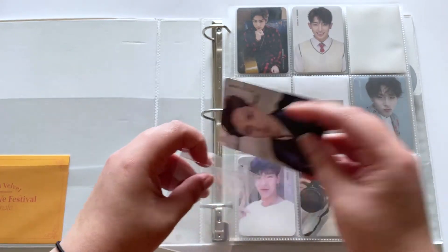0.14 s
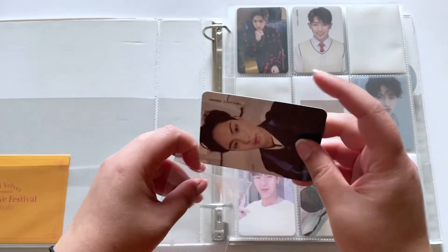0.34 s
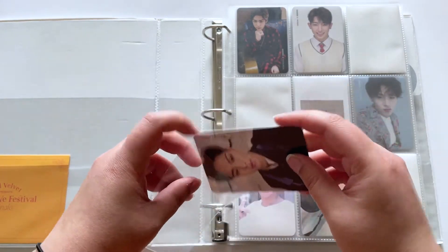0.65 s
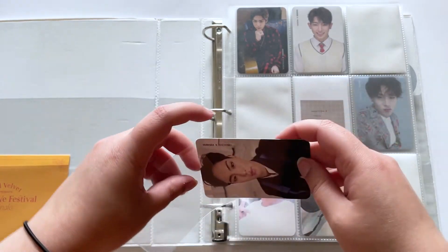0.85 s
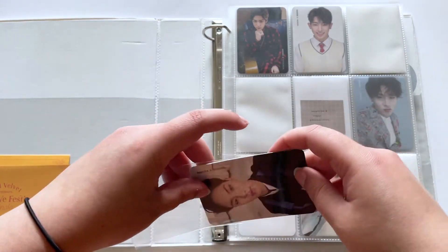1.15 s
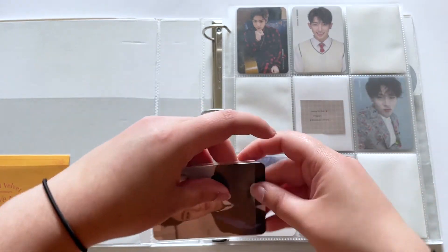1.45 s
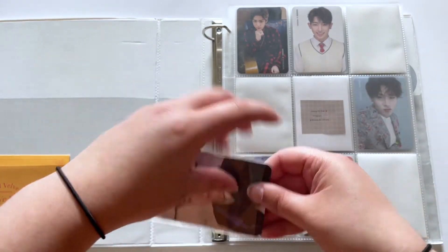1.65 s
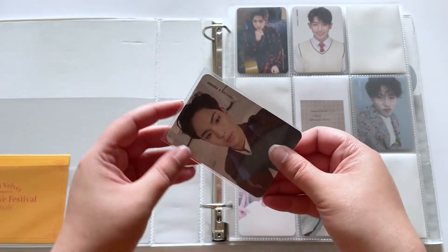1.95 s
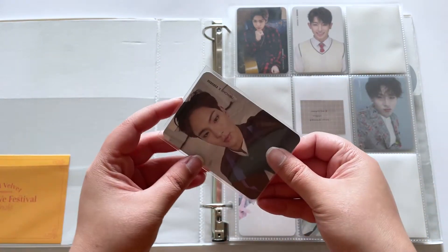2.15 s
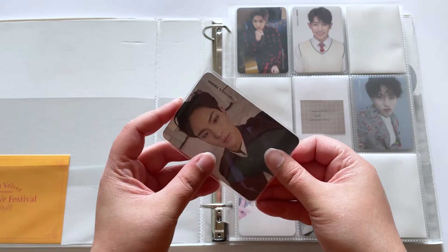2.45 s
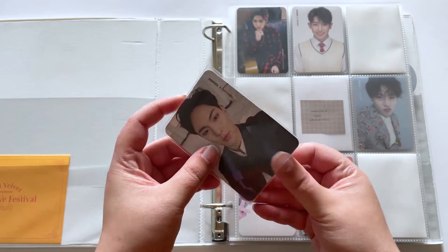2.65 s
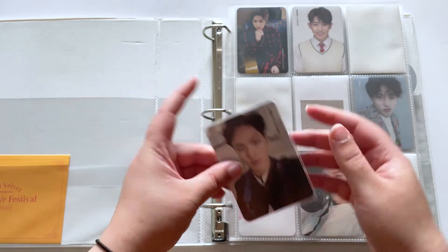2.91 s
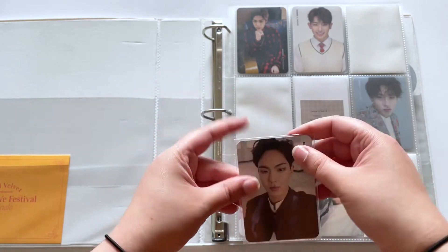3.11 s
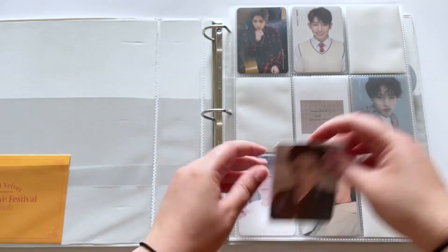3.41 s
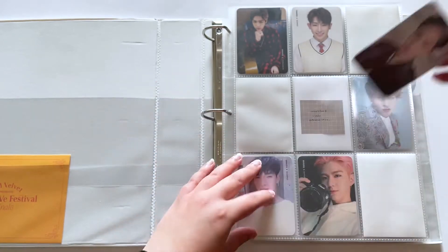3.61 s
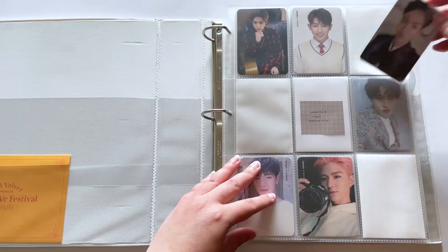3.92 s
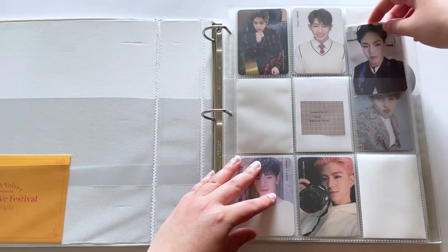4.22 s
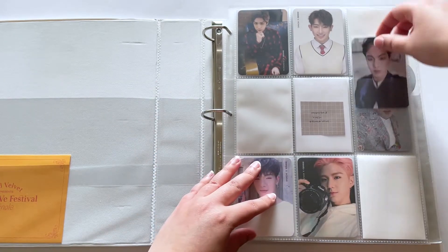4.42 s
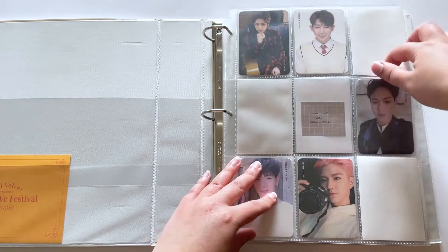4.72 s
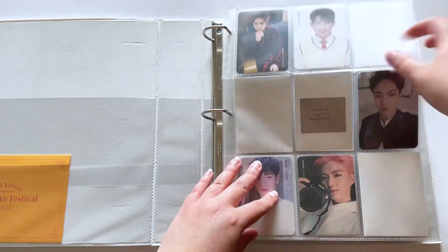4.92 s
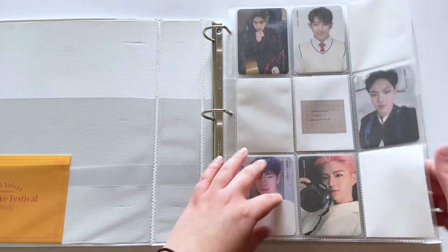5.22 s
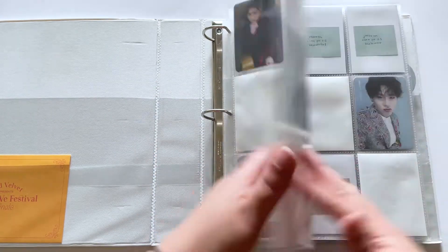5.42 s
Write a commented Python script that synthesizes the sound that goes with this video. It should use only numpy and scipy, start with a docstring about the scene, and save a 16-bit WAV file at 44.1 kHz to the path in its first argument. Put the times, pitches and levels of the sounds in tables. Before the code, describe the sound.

A quiet, close stereo sound in a small room with a short reverberation and faint low hum. From 0 to 0.5 s fingertips lightly rub a stiff glossy card. Around 0.6-0.8 s its edge knocks in dry hollow ticks, with crackle and a soft low thud from the binder cover. Light rubs and touches continue, with a small falling ripple near 1.3 s. At 1.7-1.9 s a thin scrape meets a rapid cluster of bright nail flicks. After a near-silent pause, a falling hiss from 2.6 s ends in a crisp snap at 2.76 s and a faint lingering ring. Small touches follow from 3.2 to 3.5 s. The loudest click comes at 3.97 s, then the card slides with fine hiss and tiny snags until 4.8 s. A strong snap at 4.92 s starts the page rustling, crunching and popping hollowly around 5.13 s, with sparser pops and rustle until the end at about 5.6 s.

```python
"""Fingers first rub and tap a stiff photo card over a ring binder, whose cover thuds as hands bump it.
The card's edge is then scraped and flicked and snaps free, and a faint falling ring lingers in the room.
The card slides down a plastic sleeve pocket, snagging and snapping; the lifted page rustles and buckles.
Friction is random tiny slips; releases are pulses rung through modes, their bending waves treble first.
A small room answers throughout over a low hum, heard at two nearby microphone ports."""
import sys
import numpy as np
from scipy import signal
from scipy.fft import rfft, irfft
from scipy.io import wavfile

SR = 44100
rng = np.random.default_rng(int(sys.argv[2]) if len(sys.argv) > 2 else 0)


def put_to_file(sound):
    """Save the sound as 16-bit audio at rate SR, in the file named by the first command-line argument."""
    columns = np.atleast_2d(sound).T  # one column per channel
    safe = np.clip(columns, -1, 1)
    whole_steps = np.round(safe * 32767)
    wavfile.write(sys.argv[1], SR, whole_steps.astype(np.int16))


N = 245195

# friction spectrum of a finger on the glossy card: frequency_hz, level_db
FINGER_HISS = [(1200, -24.5), (2800, -3), (4000, -2), (5500, 2), (7000, 0), (9000, 6), (12000, 0.5),
               (14000, 1.5), (16000, -21)]
# friction spectrum of the duller scuff beneath: frequency_hz, level_db
SCUFF = [(150, 3.5), (350, 16.5), (700, 0), (1300, -2), (2300, 1), (3500, -12.5), (7000, -31)]
POP_HZ = np.fft.rfftfreq(4096, 1 / SR)  # frequency axis of every pop


def undb(db):
    """Level to amplitude: 20 dB is a factor of ten."""
    return 10 ** (np.asarray(db) / 20)


def unit(x):
    """Normalisation of a signal to rms 1."""
    return x / np.sqrt(np.mean(x ** 2))


def shape(points, hz):
    """Spectral envelope: (Hz, dB) points read as gains on a log-frequency axis."""
    f, db = np.transpose(points)
    return undb(np.interp(np.log(hz + 1), np.log(f), db))


def colour(x, points):
    """Zero-phase filtering by a (Hz, dB) spectrum."""
    hz = np.fft.rfftfreq(x.shape[-1], 1 / SR)
    return irfft(rfft(x) * shape(points, hz), x.shape[-1])


def resonance(hz, centre_hz, width_hz):
    """Damped oscillator: the response of one mode, 1 at its centre."""
    return 1j * hz * width_hz / (centre_hz ** 2 - hz ** 2 + 1j * hz * width_hz)


def ringing(modes, hz):
    """Modal superposition of (Hz, width Hz, dB) modes; neighbours cancel between their peaks."""
    return sum(undb(db) * resonance(hz, f, width) for f, width, db in modes)


def causal(gain):
    """Minimum phase: the response with these gains that starts at once and then dies away."""
    cepstrum = irfft(np.log(gain))
    half = len(cepstrum) // 2
    # fold negative time onto positive time
    cepstrum[1:half] *= 2
    cepstrum[half + 1:] = 0
    return np.exp(rfft(cepstrum))


def travel(hz, ms):
    """Bending-wave dispersion: speed grows as the root of frequency; ms is the travel time at 1 kHz."""
    return np.exp(-4j * np.pi * ms * np.sqrt(hz / 1000))


def walk(rate):
    """Random modulation: normal values, rate of them a second, joined by straight lines."""
    knots = rng.standard_normal(N)
    return np.interp(np.arange(N) / SR * rate, np.arange(N), knots)


def add(track, s, sound):
    """Superposition: mix a sound in at time s."""
    i = max(int(s * SR), 0)
    track[i:i + len(sound)] += sound[:max(N - i, 0)]


def swell(start, end, peak_share):
    """Envelope of one movement or hiss: from 0 to 1 and back, it gathers, peaks and eases off."""
    strongest = start + (end - start) * np.clip(peak_share, .05, .95)
    progress = np.interp(np.arange(N) / SR, [start, strongest, end], [0, 1, 0])
    return np.sin(np.pi / 2 * progress) ** 0.49


def effort(strokes, peak_share, axis, steepness=1):
    """Gain over time of a series of strokes, from one of their dB columns."""
    return sum(undb(row[axis]) * swell(row[0], row[1], peak_share) ** steepness for row in strokes)


def slips(length, per_s, grain_db):
    """Stick-slip friction: tiny slips at random moments and of unequal size."""
    happens = rng.random(length) < per_s / SR
    size_db = grain_db * np.minimum(rng.exponential(size=length), 4)
    return happens * rng.standard_normal(length) * undb(size_db)


def fading_grit(size, chatter_ms):
    """Chatter spectrum: noise that decays by 1/e in chatter_ms, scaled to unit energy."""
    t = np.arange(size) / SR
    grit = rng.standard_normal(size) * np.exp(-t * 1000 / max(chatter_ms, .1))
    return rfft(grit / np.linalg.norm(grit))


def pop(response, chatter, chatter_ms, bend_ms):
    """Impulse excitation: a stiff edge slips free, with some chatter, and rings through its response."""
    low_cut_hz = 320  # the card is too small to push long waves
    grit = fading_grit(2 * len(POP_HZ) - 2, chatter_ms)
    push = 1 + chatter * grit * 1j * POP_HZ / (5000 + 1j * POP_HZ)
    damping = 1j * np.sqrt(2) * POP_HZ * low_cut_hz
    thin = (1j * POP_HZ) ** 2 / (low_cut_hz ** 2 - POP_HZ ** 2 + damping)
    sound = irfft(push * response * thin * travel(POP_HZ, bend_ms))
    return sound / np.linalg.norm(sound) * 2.97


def contact(body_db, treble_db, chatter_ms, chatter, chatter_hz, bend_ms, rings=(), size=4096):
    """Release of a sheet: a pulse and its dying chatter, rung through the bending modes."""
    # bending resonances of card and sleeve: centre_hz, width_hz, level_db
    sheet_modes = [(696, 2600, -4.5), (1160, 620, -5.5), (1400, 370, -5), (2220, 1100, 2.5),
                   (3500, 160, -8), (5080, 230, 5.5), (6460, 140, 0.5), (10500, 6900, -4.5)]
    # colour of a bare contact: frequency_hz, level_db
    contact_colour = [(80, -30), (250, 2.5), (500, 0), (1500, -4), (4000, -4.5), (6500, -2.5), (8500, 2.5),
                      (12500, -2), (14500, -1.5), (16500, -1)]
    hz = np.fft.rfftfreq(size, 1 / SR)
    # the tiny after-slips are too small to move the long waves
    push = 1 + chatter * fading_grit(size, chatter_ms) * 1j * hz / (chatter_hz + 1j * hz)
    power = .3 + sum(abs(undb(db) * resonance(hz, f, width)) ** 2 for f, width, db in sheet_modes)
    for ring_hz, ring_db in rings:
        # an event's own resonance
        power = power + abs(undb(ring_db) * resonance(hz, ring_hz, 450 + ring_hz / 20)) ** 2
    tilt = shape([(600, body_db), (2500, 0.012), (11500, treble_db)], hz)
    response = causal(np.sqrt(power) * tilt * shape(contact_colour, hz))
    sound = irfft(push * response * travel(hz, bend_ms))
    return sound / np.linalg.norm(sound) * 3.34


def small_catches(drive, per_s, body_db, treble_db, count=500):
    """Random point process: little ticks, as strong as the movement that drives them."""
    out = np.zeros(N)
    for where, luck, loud, dull in rng.random((count, 4)):
        size_db, dull_db = 8 * (loud - .5), 16 * (dull - .5)
        tick = contact(body_db + dull_db, treble_db, chatter_ms=3.3, chatter=5.0, chatter_hz=700,
                       bend_ms=1.977, size=2048)
        if luck < per_s * N / SR / count:
            add(out, where * N / SR, drive[int(where * N)] * undb(size_db) * tick)
    return out


def sleeve_friction(strokes, peak_share, per_s, grain_db, uneven_db, steepness=1):
    """Stick-slip of thin plastic: it hisses and crackles as it is rubbed or bent."""
    # friction spectrum of the sleeve: frequency_hz, level_db
    sleeve_hiss = [(1200, -10.5), (2800, -3.5), (4200, -1.5), (6300, 4), (8000, 8), (11000, 2),
                   (13500, -5.5), (15500, -5)]
    grains = slips(N, per_s, grain_db) * undb(uneven_db * walk(110))
    hiss = unit(colour(grains, sleeve_hiss)) * effort(strokes, peak_share, axis=2, steepness=steepness)
    scuff = unit(colour(grains, SCUFF)) * effort(strokes, peak_share, axis=3, steepness=steepness)
    return hiss + scuff


def snaps(at_walls):
    """Modal excitation: card and pocket lip snap, direct or to the walls; the grip decides which modes ring."""
    # the whole card or the pocket's lip snapping free:
    # time_s, level_db, extra_level_at_walls_db, pitch_ratio, treble_db, strength_of_each_mode_db
    snap_events = [(2.7626, -11, -3.5, 0.97, -1, (-8.5, -3, -10, -7, -0.5, -6.5, -25.5, -11.5, -19)),
                   (3.6884, -33, 6.5, 0.94, -3.5, (0, -3.5, -2.5, -8, -32, -42, -19, -33, -22)),
                   (3.9457, -32, 2, 1.1, 1, (1, -2, -4, -12, -2, -13, -8, -13, -18)),
                   (3.9714, -5.5, -0.5, 1.005, 1.5, (-29.5, -22, -24.5, -12.5, -33, 1, -1.5, -22, -18.5)),
                   (4.7093, -25.5, 3.5, 0.967, -11, (-16, -0.5, 0.5, -1.5, -27, -5.5, -5.5, -29, -24)),
                   (4.9212, -12, 0, 0.96, 2.5, (-7, 4, 1.5, -14, -2, -4.5, -21.5, -24, -20))]
    # bending modes of a card against the pocket, before the pitch ratio: centre_hz, width_hz
    snap_modes = [(670, 380), (1490, 620), (2430, 360), (3420, 450), (4940, 470), (6330, 540), (7850, 1700),
                  (10700, 1300), (15500, 930)]
    # the walls hear the card from all sides: mode strengths even out and the peaks broaden
    evening, widening = .55, 1.9
    out = np.zeros(N)
    for s, db, wall_db, pitch, treble_db, strengths in snap_events:
        modes = [(f * pitch, width, mode_db) for (f, width), mode_db in zip(snap_modes, strengths)]
        response = ringing(modes, POP_HZ)
        if at_walls:
            power = sum(abs(undb(mode_db * evening) * resonance(POP_HZ, f, width * widening)) ** 2
                        for f, width, mode_db in modes)
            response = causal(np.sqrt(power + 1e-4))
            db = db + wall_db
        top = causal(shape([(8800, 0.0017), (10500, treble_db)], POP_HZ))
        sound = pop(response * top, chatter=0.39, chatter_ms=1.2, bend_ms=1.7)
        add(out, s - .0004, undb(db) * sound)
    return out


def near_snaps():
    """Direct sound: the snaps straight from the card, with a level difference between the channels."""
    # balance of the snaps between the ports: frequency_hz, left_minus_right_db
    snap_balance = [(600, -3.5), (1300, -3.5), (2500, 3), (5000, 0.5)]
    direct = snaps(at_walls=False)
    return np.array([colour(direct, [(hz, side * db / 2) for hz, db in snap_balance]) for side in (1, -1)])


def flicks():
    """Resonance of a short free corner: a fingernail flick ticks with one strong high ring."""
    # a fingernail flicking the card's corner: time_s, level_db, ring_hz
    flick_events = [(1.77, -44.5, 4800), (1.7813, -25.5, 5100), (1.8189, -28, 4900), (1.8580, -36, 4400),
                    (1.8604, -26.5, 5330), (1.8629, -23.5, 4730), (1.8787, -28, 4800)]
    # rings that every flick shares: centre_hz, width_hz, level_against_its_own_ring_db
    flick_modes = [(790, 700, -12.5), (2420, 970, -8.5), (13000, 3900, -20)]
    ring_width_hz = 750
    out = np.zeros(N)
    for s, db, hz in flick_events:
        response = ringing(flick_modes + [(hz, ring_width_hz, 0)], POP_HZ)
        add(out, s, undb(db) * pop(response, chatter=0.75, chatter_ms=1, bend_ms=1.03))
    return out


def buckles():
    """Buckling instability: the bending page pops through, each pop with a hollow ring of its own."""
    # the lifted page buckling: time_s, level_db, ring_hz, ring_db, treble_db
    buckle_events = [(5.1273, -35, 2150, 4, 0), (5.1315, -25.5, 2180, 6, 1), (5.1345, -25, 1920, 19, 3.5),
                     (5.1377, -26.5, 2100, 16, -3), (5.1495, -29.5, 2230, 12, 4), (5.155, -44, 2500, 2, -5),
                     (5.3958, -33, 1363, -1, -10), (5.406, -35, 2170, 5, -6), (5.5538, -31.5, 3570, 7, -6)]
    # rings that every buckle shares: centre_hz, width_hz, level_db
    buckle_modes = [(720, 240, -0.5), (1020, 490, -4), (1640, 880, -11), (2500, 360, -12.5),
                    (3450, 880, -18), (5830, 800, -3.5), (6640, 310, -6.5), (10900, 8600, -26.5)]
    ring_width_hz = 210
    out = np.zeros(N)
    for s, db, hz, ring_db, treble_db in buckle_events:
        top = causal(shape([(2500, 0), (6000, treble_db)], POP_HZ))
        response = ringing(buckle_modes + [(hz, ring_width_hz, ring_db)], POP_HZ) * top
        add(out, s, undb(db) * pop(response, chatter=0.69, chatter_ms=1, bend_ms=0.776))
    return out


def taps():
    """Impact on a plate: the card's edge knocks on the flat page in separate, hollow ticks."""
    # the card's edge tapping the page: time_s, level_db, body_db, treble_db, chatter_ms
    tap_events = [(0.583, -46.5, -3, -9, 2.5), (0.589, -43, 0, -8, 2), (0.594, -47.5, 1, -6, 1.5),
                  (0.6759, -31.5, -6, -16, 0.92), (0.6895, -44.5, -2, -8, 2), (0.6941, -42, 13, -4, 2),
                  (0.7236, -34, 4, -1, 1.4), (0.727, -26.5, 7.5, 1.5, 3.3), (0.7803, -40, -6, -12, 2.6)]
    # what the page rings with as it lies flat: centre_hz, width_hz, level_db
    tap_modes = [(573, 160, 10.5), (1080, 640, -5.5), (2120, 210, 2.5), (2740, 500, 1), (3800, 610, -2.5),
                 (5300, 700, -12), (10300, 12000, -7)]
    out = np.zeros(N)
    for s, db, body_db, treble_db, chatter_ms in tap_events:
        tilt = causal(shape([(600, body_db), (2200, 0), (5000, 0), (11500, treble_db)], POP_HZ))
        response = ringing(tap_modes, POP_HZ) * tilt
        add(out, s, undb(db) * pop(response, chatter=1, chatter_ms=chatter_ms, bend_ms=0.862))
    return out


def touches():
    """Soft impact: fingertips land and catch with more chatter than pulse."""
    # fingertips landing on card and page: time_s, level_db, body_db, treble_db
    touch_events = [(0.192, -48.5, 6, -14), (0.4671, -36.5, 14, -18), (0.943, -46.5, 22, -13),
                    (1.054, -39, 18.5, -6), (1.267, -44.5, 15, -12), (1.317, -45, 6, -10),
                    (1.416, -57, 2, -18), (1.4822, -36.5, -2, -13), (1.598, -39, 3.5, -11.5),
                    (1.6674, -35.5, 6.5, -8), (2.726, -42, 25, -7.5), (3.158, -49, -10, -5),
                    (3.175, -45, -2, 10), (3.272, -47, 13.5, 3.5), (3.313, -49, -3, -2),
                    (3.422, -41.5, 10, 8.5), (3.48, -42, 12, -5), (4.847, -48.5, 0, -7.5),
                    (5.4462, -39, 4, -12), (5.542, -34.5, -1, -21)]
    out = np.zeros(N)
    for s, db, body_db, treble_db in touch_events:
        sound = contact(body_db, treble_db, chatter_ms=2.6, chatter=3.0, chatter_hz=693, bend_ms=1.966)
        add(out, s, undb(db) * sound)
    return out


def rubs():
    """Sliding friction: each finger stroke swells and fades, hissing on the gloss and scuffing the card."""
    # fingers sliding over the card: start_s, end_s, hiss_db, treble_db, scuff_db
    strokes = [(0, 0.099, -68.5, -9, -78), (0.072, 0.125, -59, -5.5, -69), (0.184, 0.267, -80.5, 2, -67.5),
               (0.449, 0.49, -74, -15, -72), (0.49, 0.505, -63, -1, -60.5),
               (0.575, 0.661, -65.5, -4, -64.5), (0.656, 0.743, -58.5, -2, -61),
               (0.716, 1.088, -80.5, -5, -69), (1.069, 1.194, -64.5, 2, -69.5),
               (1.211, 1.487, -64.5, 6, -72), (1.476, 1.522, -53.5, 7.5, -63.5),
               (1.569, 1.82, -69, -5, -73.5), (1.983, 2.035, -74.5, -9, -84),
               (2.645, 2.785, -66, -5.5, -78.5), (3.164, 3.207, -70, 10, -72.5),
               (3.319, 3.348, -60.5, 1, -62), (3.401, 3.49, -73.5, 4, -80)]
    peak_share = 0.27  # a stroke is fastest this far through
    catch_db = 11  # skin catching as it slides; level over the scuff
    grains = slips(N, per_s=13000, grain_db=2.0) * undb(3.0 * walk(130))
    hiss, scuff = colour(grains, FINGER_HISS), unit(colour(grains, SCUFF))
    drag = effort(strokes, peak_share, axis=4)
    catches = small_catches(drag * undb(catch_db), per_s=41, body_db=12.5, treble_db=-10)
    out = drag * scuff + catches
    for start, end, hiss_db, treble_db, _ in strokes:
        span = np.arange(max(int(start * SR), 0), int(end * SR))
        bright = unit(colour(hiss[span], [(5500, 0.0017), (10500, treble_db)]))
        add(out, start, swell(start, end, peak_share)[span] * undb(hiss_db) * bright)
    return out


def falling_hisses():
    """Modulated tone: narrow hisses of falling pitch, from a scraped edge and a last faint ring in the room."""
    # a fingertip along the card's edge, and last the faint ring lingering in the room after the snap:
    # start_s, end_s, first_hz, last_hz, level_db, peak_share (how far through it is strongest)
    hisses = [(1.697, 1.80, 6000, 5300, -69, 0.64), (1.85, 1.95, 4900, 4500, -80.5, 0.27),
              (2.57, 2.668, 5020, 4500, -76, .5), (2.637, 2.784, 4500, 3550, -66.5, 0.52),
              (2.77, 2.92, 4885, 4700, -76, 0.46)]
    out = np.zeros(N)
    grains = slips(N, per_s=8300, grain_db=-2.5)
    wobble = unit(colour(grains, [(350, -0.5), (800, -5.5), (1500, -18.0), (3000, -54.5)]))
    broad = unit(colour(grains, FINGER_HISS)) * undb(-5)
    for start, end, first_hz, last_hz, db, peak_share in hisses:
        hz = np.interp(np.arange(N) / SR, [start, end], [first_hz, last_hz])
        tone = np.sin(2 * np.pi * np.cumsum(hz) / SR)
        out += undb(db) * swell(start, end, peak_share) * (tone * wobble + broad)
    return out


def pocket_slide():
    """Sliding friction in a tight sleeve: a fine hiss, the card's corners snagging now and then."""
    # the card pushed down the pocket: start_s, end_s, hiss_db, scuff_db
    pushes = [(3.9, 4.32, -71.5, -82.5), (4.28, 4.63, -72.5, -86), (4.51, 4.80, -65.5, -71.5)]
    # the card's corners snagging in the pocket: time_s, level_db, ring_hz, chatter_ms
    snags = [(3.3246, -41.5, 2170, 2.2), (3.333, -50, 2210, 4), (4.1404, -49.5, 2230, 2.3),
             (4.219, -47.5, 2590, 7.5), (4.229, -45.5, 2390, 4.1), (4.5234, -48, 1260, 4),
             (4.6624, -46.5, 1720, 2.1), (4.682, -49, 6800, 4)]
    # friction grows steeply as the pocket tightens round the card
    out = sleeve_friction(pushes, peak_share=0.71, per_s=22000, grain_db=-0.5, uneven_db=-1.0, steepness=3.5)
    for s, db, hz, chatter_ms in snags:
        sound = contact(body_db=4.5, treble_db=0.5, chatter_ms=chatter_ms, chatter=3.3, chatter_hz=696,
                        bend_ms=1.987, rings=[(hz, 16)])
        add(out, s, undb(db) * sound)
    return out


def page_flexes():
    """Bending strain: the page rustles, and small creases give way in it."""
    # the page flexing under the hands: start_s, end_s, hiss_db, scuff_db
    flexes = [(4.92, 4.99, -50.5, -55), (4.98, 5.13, -64, -62), (5.13, 5.26, -59.5, -62.5),
              (5.21, 5.42, -78, -69.5), (5.44, 5.63, -65.5, -61)]
    peak_share = 0.13
    crinkle_db = 8.5  # small creases giving way; level over the scuff
    rustle = sleeve_friction(flexes, peak_share, per_s=3000, grain_db=-1.0, uneven_db=3.0)
    bend = effort(flexes, peak_share, axis=3)
    return rustle + small_catches(bend * undb(crinkle_db), per_s=60, body_db=8.5, treble_db=-13)


def creases():
    """Sudden release of strain: single creases crunch as the page lifts."""
    # creases in the page giving way: time_s, level_db, ring_hz, treble_db
    crease_events = [(4.955, -36.5, 2400, -3), (4.973, -45, 1000, -16), (5.008, -48, 750, -20),
                     (5.034, -46, 1100, -20), (5.047, -42.5, 1372, -46), (5.057, -50, 1200, -58),
                     (5.154, -38, 2700, 9), (5.16, -40, 1270, -18), (5.486, -41.5, 1810, 1),
                     (5.501, -39, 980, 2), (5.506, -53, 2100, -9)]
    out = np.zeros(N)
    for s, db, hz, treble_db in crease_events:
        sound = contact(body_db=4, treble_db=treble_db, chatter_ms=4.5, chatter=4.6, chatter_hz=700,
                        bend_ms=1.964, rings=[(hz, 22)])
        add(out, s, undb(db) * sound)
    return out


def ripples():
    """Dispersion: a jolt runs across the page and spreads into a short falling chirp."""
    # bending waves that cross the whole page: time_s, level_db, travel_at_1khz_ms, body_db, treble_db
    jolts = [(4.928, -29.5, 19, 2.5, -16), (1.262, -38.5, 12, 22, -10), (1.298, -48, 16, 11, -15)]
    out = np.zeros(N)
    for s, db, bend_ms, body_db, treble_db in jolts:
        sound = contact(body_db, treble_db, chatter_ms=2, chatter=1, chatter_hz=2000, bend_ms=bend_ms)
        add(out, s, undb(db) * sound)
    return out


def crackles(count=8000, size=512):
    """Crackling noise: pressed plastic gives way in tiny grains, each with its own pitch and size."""
    # fingers pressing on card and sleeve: start_s, end_s, level_db, treble_db
    grips = [(0.575, 0.62, -67, 3), (0.675, 0.708, -56.5, -4), (0.74, 0.89, -74, -1),
             (0.962, 1.02, -73.5, 7), (1.255, 1.336, -65.5, -10.5), (1.377, 1.428, -73.5, 1),
             (1.684, 1.708, -63, 6), (5.007, 5.093, -58.5, -20.5), (5.121, 5.175, -52, -15),
             (5.183, 5.295, -69, -9)]
    per_s, spread_db, ring_cycles = 800, 4, 6.4
    low_hz, high_hz = 726, 5240
    grains, out, t = np.zeros(N), np.zeros(N), np.arange(size) / SR
    for where, luck, pitch, loud in rng.random((count, 4)):
        if luck < per_s * N / SR / count:
            hz = low_hz * (high_hz / low_hz) ** pitch
            strength = undb(spread_db * min(-np.log(1 - loud), 3)) * np.sqrt(hz)
            ring = np.sin(2 * np.pi * hz * t) * np.exp(-2 * hz * t / ring_cycles)
            add(grains, where * N / SR, strength * ring)
    for start, end, db, treble_db in grips:
        coloured = unit(colour(grains, [(800, 0), (4000, treble_db)]))
        out += undb(db) * swell(start, end, peak_share=0.15) * coloured
    return out


def bumps():
    """Free decay of struck modes: a soft hand makes the binder's cover thud."""
    # hands bumping the binder: time_s, level_db
    bump_events = [(0.677, -44), (0.726, -36.5), (5.406, -45.5)]
    # the binder's cover: frequency_hz, level_db, t60_s
    binder_modes = [(91, 4, 0.043), (267, 7.5, 0.016), (517, 5, 0.022), (558, 3, 0.02)]
    out, t = np.zeros(N), np.arange(SR // 4) / SR
    thud = sum(undb(db - 60 * t / t60) * np.sin(2 * np.pi * hz * t) for hz, db, t60 in binder_modes)
    onset = np.minimum(t / 0.0041, 1)  # rise time in s
    for s, db in bump_events:
        add(out, s, undb(db) * thud * onset)
    return out


def apart(common, own, spread):
    """Partial coherence: diffuse sound differs between the ports, mostly in the middle range."""
    side = colour(own, [(50, -12.5), (250, 3.0), (1000, 9.0), (4000, 2.5), (8000, -25)])
    return common + spread * side * np.array([[1], [-1]])


def room(x, wet_db, t60_s, first_s, size=22050):
    """Reverberation: near walls answer after a short gap, as separate echoes that thicken into a tail."""
    # colour of the room's answer: frequency_hz, level_db
    wall_colour = [(150, -2), (500, 2.5), (1400, 0), (3000, -2.5), (6000, -5.5), (10000, -3.5),
                   (13500, -10), (15500, -10.5)]
    t = np.arange(size) / SR
    # echo sizes are most unequal at first
    uneven_db = 7.46 * np.exp(-t / 0.016) * np.minimum(rng.exponential(size=(2, size)), 4)
    echoes = rng.standard_normal((2, size)) * undb(uneven_db)
    fade = undb(-60 * t / t60_s) * np.interp(t, [0, first_s * 0.82, first_s], [.25, .3, 1])
    tails = colour(unit(echoes * fade), wall_colour) * undb(wet_db) / np.sqrt(size)
    common, own = (signal.fftconvolve(x, tail)[:N] for tail in tails)
    return apart(common, own, spread=0.4)


def air():
    """Filtered noise: low rumble with faint hiss above, and a wavering hum of narrow bands."""
    # spectrum of rumble and hiss, before levelling: frequency_hz, density_db
    air_spectrum = [(20, -20.5), (30, -17.5), (42, -1), (60, 0.5), (120, -0.5), (170, -7.5), (280, -13.5),
                    (420, -19), (620, -29.5), (800, -26), (1500, -39.5), (4000, -45.5), (11000, -51.5),
                    (16000, -72)]
    # the room's low hum, before its swell and the squaring of each resonance: centre_hz, width_hz, level_db
    hum_bands = [(84.9, 8.2, -64), (160, 8.9, -75.5), (290.6, 10, -82)]
    # the hum swells a little: time_s, gain_db
    hum_swell = [(0, -2), (3.401, 0.5), (3.9, 4.5), (4.3, 1), (4.85, 4.5), (5.0, 5.5), (5.56, 6.5)]
    air_db = -59.5
    hz = np.fft.rfftfreq(N, 1 / SR)
    common, own = (unit(colour(rng.standard_normal(N), air_spectrum)) * undb(air_db) for _ in range(2))
    hum = np.zeros(N)
    for f, width, db in hum_bands:
        band = irfft(rfft(rng.standard_normal(N)) * resonance(hz, f, width) ** 2, N)
        hum += undb(db) * unit(band)
    hum_gain = undb(np.interp(np.arange(N) / SR, *np.transpose(hum_swell)))
    return apart(common, own, spread=0.35) + hum * hum_gain


def scene():
    """Superposition of direct sound, the room's answer and the background."""
    card = flicks() + taps() + touches() + rubs() + crackles() + falling_hisses() + pocket_slide()
    page = buckles() + creases() + ripples() + bumps() + page_flexes()
    walls = room(card + page + snaps(at_walls=True), wet_db=-9.5, t60_s=0.3, first_s=.008)
    return card + page + near_snaps() + walls + air()


def record(dry):
    """Interchannel difference: the two ports differ in phase and level; the top is cut."""
    # phase between the ports: frequency_hz, left_lead_rad
    port_phase = [(20, 0), (1300, -.2), (2800, .5), (4000, .2), (5200, .7), (6800, -1.1), (8100, -3.14),
                  (11500, -6.28), (15000, -9.42), (17000, -10)]
    # level between the ports: frequency_hz, left_minus_right_db
    port_balance = [(60, 2.5), (380, 3.5), (600, 3), (1300, 2.5), (2500, 5), (5000, 5.5), (8000, 0),
                    (15000, 0)]
    top_hz = 16600
    hz = np.fft.rfftfreq(N, 1 / SR)
    # each port takes half of the difference
    port = np.sqrt(shape(port_balance, hz)) * np.exp(.5j * np.interp(hz, *np.transpose(port_phase)))
    heard = irfft(rfft(dry) * np.array([port, 1 / port]), N)
    return signal.sosfilt(signal.ellip(10, .2, 70, top_hz, fs=SR, output="sos"), heard)


dry = scene()
out = record(dry)
put_to_file(out)
```